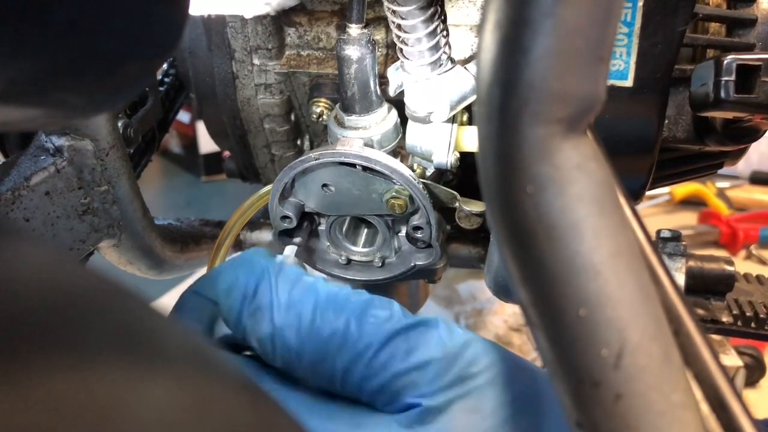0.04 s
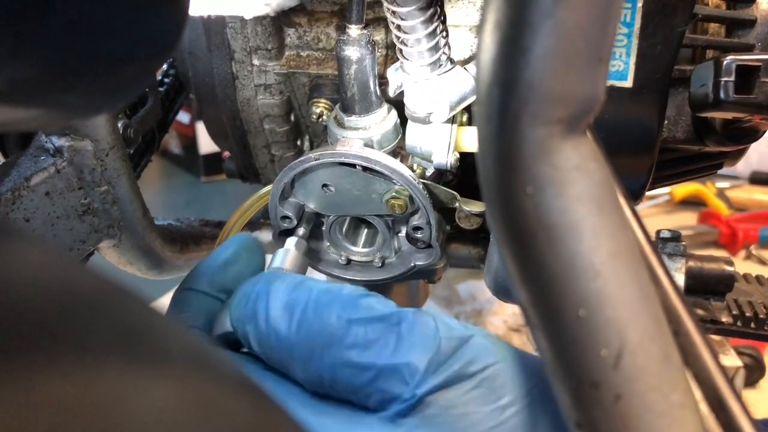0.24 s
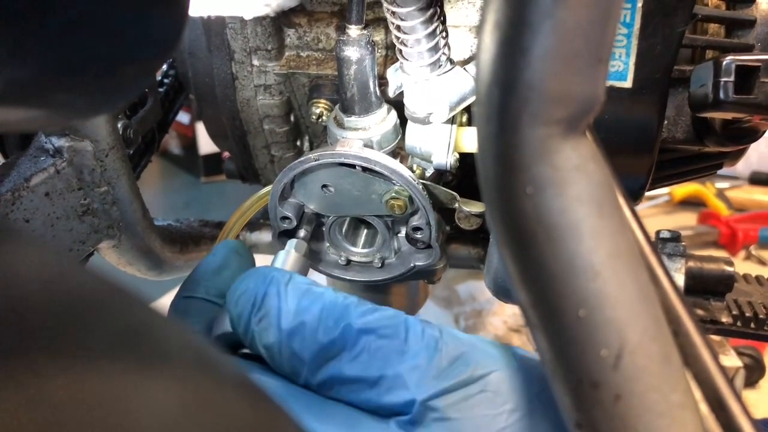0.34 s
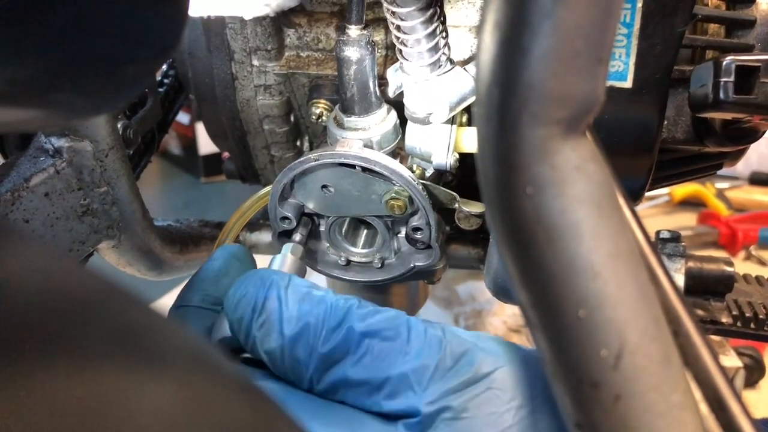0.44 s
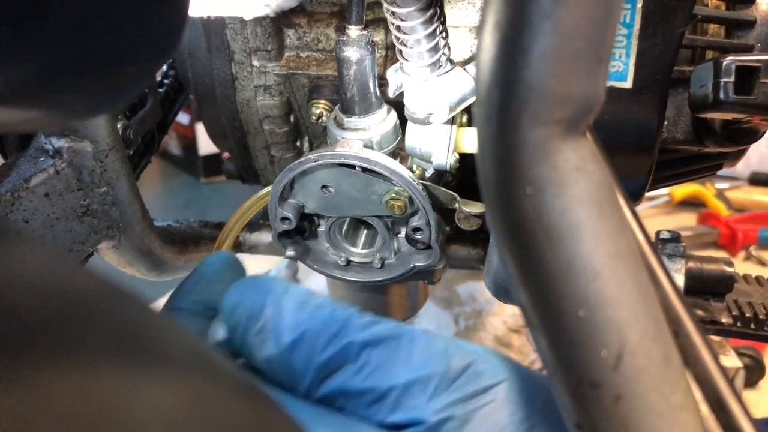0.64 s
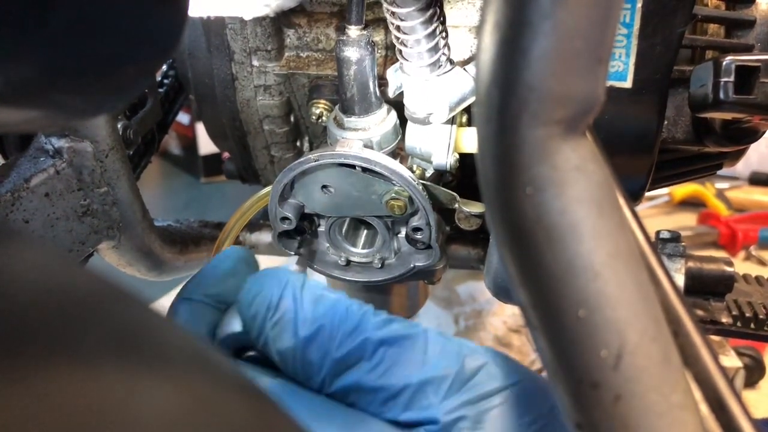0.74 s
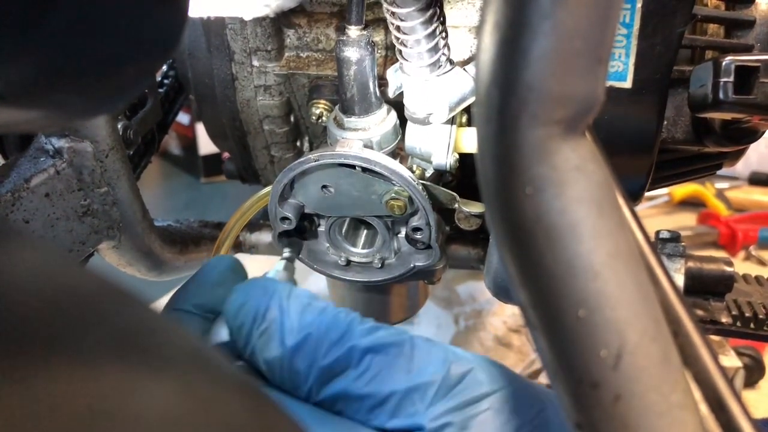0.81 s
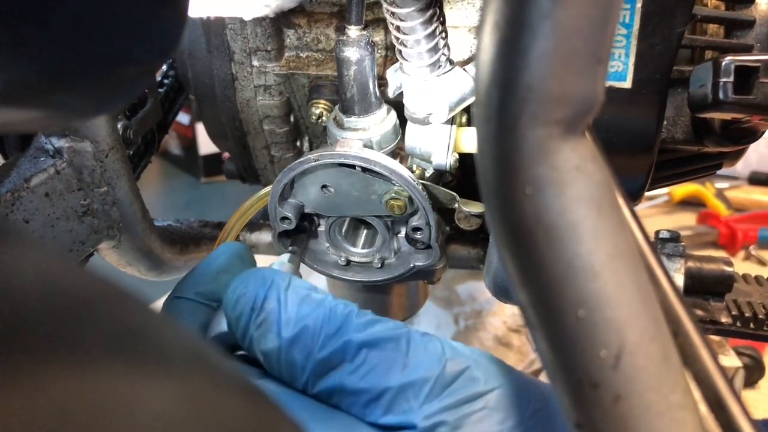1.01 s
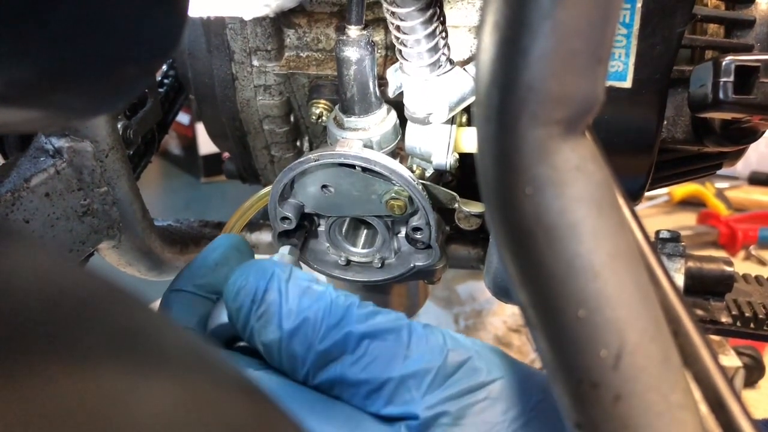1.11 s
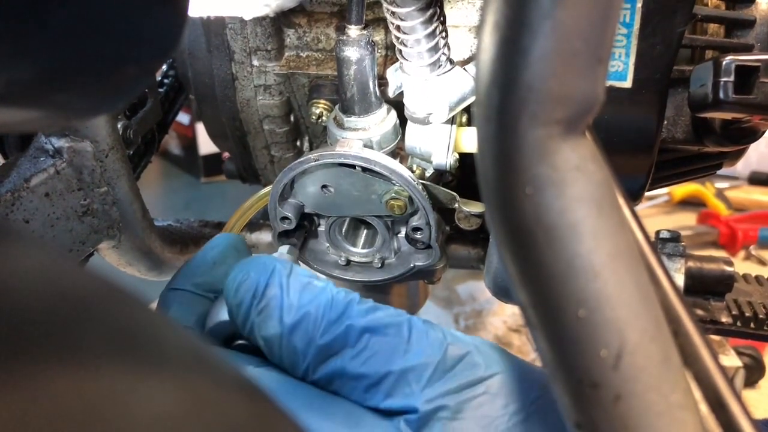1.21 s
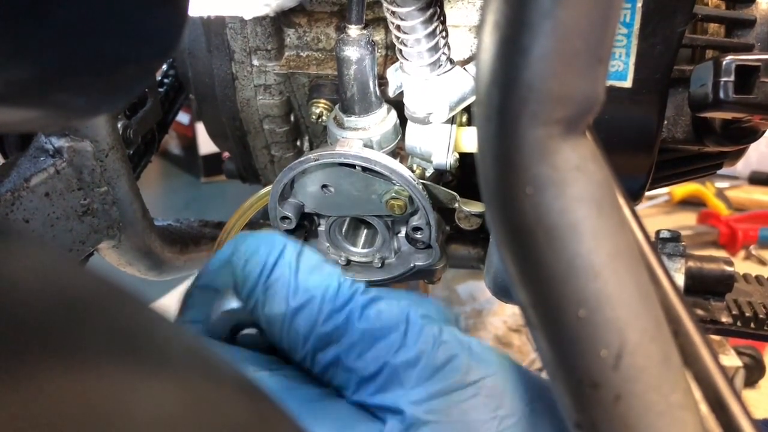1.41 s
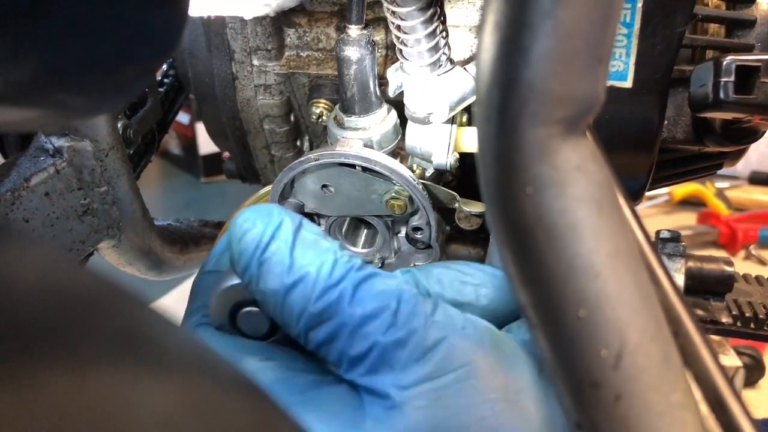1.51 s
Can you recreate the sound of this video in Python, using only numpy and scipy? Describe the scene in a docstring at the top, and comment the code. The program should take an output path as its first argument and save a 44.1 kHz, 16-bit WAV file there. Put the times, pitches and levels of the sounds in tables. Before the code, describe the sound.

Close up in a quiet workshop, ratchet clicks come in a loose cluster, pause, then a couple more sharp snaps; bit scrapes and soft hand bumps between, glove rustle and faint hiss at the end.

```python
"""Steel snaps among the scrapes of a bit: a small hand ratchet nudges an engine's carburettor screw.
Each snap is a noise crack, a chatter of random contacts and damped steel modes, shaped in five bands.
A thud chirps down through the engine's frame after it; the hand's soft bumps are filtered thuds.
Scrapes and a rubber glove's rubs, mostly near the end, are filtered random slips; a hiss swells and fades.
All of it is close by in a quiet workshop, with a faint reverberation, still air and a low hum."""
import sys
import numpy as np
from scipy import signal
from scipy.fft import rfft, irfft
from scipy.io import wavfile

SR = 44100
rng = np.random.default_rng(int(sys.argv[2]) if len(sys.argv) > 2 else 0)


def generate_wav(signal):
    """Clip the signal to [-1, 1] and save it as 16-bit WAV at the path in sys.argv[1]."""
    frames = np.transpose(np.atleast_2d(signal))
    scaled = np.clip(frames, -1, 1) * 32767
    pcm = np.round(scaled).astype(np.int16)
    wavfile.write(sys.argv[1], SR, pcm)


N = 68355

# still air, spectrum: hz, level_db
AIR_SPECTRUM = [(25, -17), (60, 13.5), (140, 11.5), (300, 9), (600, 1.5), (1200, -3), (3000, -5.5),
                (8000, -13.5), (16000, -9)]
AIR_DB, HUM_HZ, HUM_DB = -67, 147, -79

# workshop reverberation: low_hz, high_hz, t60_s, level_db
ROOM_TAIL = [(80, 916, 0.16, -6), (650, 2150, 0.79, -22.5), (1830, 6800, 0.26, -19),
             (8400, 19000, .25, -28)]
EARLY_DB, EARLY_T60_S = -24, 0.1

# hiss that swells and fades, level over time: time_s, level_db
HISS_LEVEL_CURVE = [(0, -103), (.08, -75), (0.129, -54), (.2, -57.5), (.25, -70), (.31, -58), (.37, -58),
                    (.44, -56.5), (.5, -71.5), (0.701, -96.5), (1.192, -88.5), (1.22, -60), (1.27, -83),
                    (1.38, -68), (1.46, -60), (1.55, -61.5)]
# hiss that swells and fades, spectrum: hz, level_db
HISS_SPECTRUM = [(1000, -6), (3500, 5.5), (7000, 2.5), (11000, 3.5), (15500, 6)]

# rubs of the glove on the handle: start_s, length_s, level_db, rasp_hz
GLOVE_RUBS = [(0, .055, -57, 2128), (0.809, 0.095, -67.5, 3200), (1.205, 0.027, -69.5, 3100),
              (1.304, .022, -54, 3960), (1.35, 0.023, -61.5, 3500), (1.414, 0.073, -63, 2960),
              (1.453, 0.05, -58, 2870)]
# rubber on steel, spectrum: hz, level_db
RUB_SPECTRUM = [(500, -4), (1800, -3), (2900, -1), (3800, -5.5), (5000, -11.5), (7500, -8), (10000, -17),
                (16000, -21)]
RUB_RASP_DB, RUB_WIDTH = -4.5, 0.57  # width as a share of the rasp's pitch

# scrapes of the bit in the screw: start_s, length_s, level_db, centre_hz
BIT_SCRAPES = [(0, 0.0061, -37.5, 1100), (.01, 0.064, -53.5, 970), (0.059, 0.031, -52, 694),
               (0.149, 0.047, -46, 1050), (0.246, 0.02, -58, 1080), (0.32, 0.048, -51, 1000),
               (0.378, 0.0064, -46.5, 680), (0.423, 0.093, -64.5, 850), (0.832, 0.014, -53.5, 1086),
               (0.862, 0.014, -50.5, 520), (0.886, 0.022, -56, 592), (.915, 0.024, -77, 604),
               (0.919, 0.02, -64.5, 1360), (0.984, .03, -59, 1100), (1.085, 0.09, -60, 850),
               (1.144, 0.0034, -46.5, 1550), (1.166, 0.027, -71, 750)]
SCRAPE_WIDTH, SCRAPE_GRIT_DB, SCRAPE_RELEASE_S = 0.53, -9.5, 0.011  # width as a share of the centre
SCRAPE_FRAME_GAIN = 10 ** (-4 / 20) / 6

# modes of engine and frame: hz, level_db, t60_s
FRAME_MODES = [(147.2, 1.5, 0.2), (230, -4.5, 0.072), (338, -4, 0.23), (458, -4.5, .08), (552, 0.5, .07),
               (680, -7.5, .07), (1066.5, 3, .18), (1152, 1, 0.23), (1246, 1.5, 0.16)]
# thud through the frame, spectrum: hz, level_db
THUD_SPECTRUM = [(40, -27), (90, -14), (145, -1.5), (200, -5.5), (330, -3), (550, -0.5), (800, -5.5),
                 (1200, -20), (3000, -62)]
THUD_LAG_S, THUD_T60_S, THUD_RING_DB = 0.01711, 0.071, -8.5  # lag at 150 Hz
# soft bumps of the hand on the frame: start_s, level_db, highest_hz
HAND_BUMPS = [(-.015, -39.5, 455), (0.442, -57.5, 88), (0.777, -47, 152), (1.09, -54, 200),
              (1.207, -56.5, 300), (1.305, -51.5, 184), (1.376, -58.5, 181), (1.456, -52.5, 607)]

# snaps of pawl and socket: start_s, chatter_s, thud_db, ring_db in five bands from low to high,
# focus_hz (where the tool's modes are struck harder)
RATCHET_SNAPS = [(0.049, 0.002, -49.5, -56, -63.5, -62.5, -70, -76, 2130),
                 (0.206, 0.0037, -33, -25.5, -27, -28, -27, -34.5, 1733),
                 (0.292, 0.0012, -46, -52, -59, -48.5, -52, -47.5, 3200),
                 (0.3163, 0.0032, -41, -34, -45.5, -42.5, -32.5, -28, 7280),
                 (0.387, 0.0019, -50.5, -70, -59.5, -63, -57.5, -58, 6640),
                 (0.4555, 0.001, -54.5, -53.5, -61, -56, -52.5, -67, 5378),
                 (0.5537, 0.0049, -66.5, -66, -62, -57, -56.5, -53, 4480),
                 (0.6045, 0.0055, -42, -42.5, -63.5, -51.5, -38.5, -38.5, 7900),
                 (0.7531, 0.0022, -56.5, -52.5, -62, -59, -52, -59.5, 5378),
                 (0.7699, 0.003, -48.5, -48, -42.5, -33, -33.5, -60, 2930),
                 (1.0215, 0.0054, -38.5, -37.5, -33.5, -31.5, -26, -37.5, 7280),
                 (1.16, 0.0023, -49.5, -53.5, -77, -50.5, -56, -63.5, 3200),
                 (1.1909, 0.0018, -62, -65, -67, -61, -71.5, -93, 2930)]
# edges of the five ring bands: hz
RING_EDGES_HZ = [800, 1400, 2500, 4200, 8500, 16500]
# modes of the steel tool: hz, level_db, t60_s
TOOL_MODES = [(1067, 1, 0.041), (1243.7, -2, 0.055), (1726, -1.5, 0.028), (2120, -7.5, 0.079),
              (2260, -0.5, 0.03), (2930, 1.5, 0.023), (3238, -1.5, .024), (4480, -15.5, 0.082),
              (5378, -0.5, 0.026), (6170, -13.5, .08), (6650, -0.5, 0.023), (7280, 0.5, 0.033),
              (7900, 2, 0.018), (9900, 1, 0.0064)]
# spectrum of the top ring band: hz, level_db
TOP_SPECTRUM = [(8500, 0), (11000, -1), (12500, -3.5), (16000, -2.5)]
FOCUS_DB, FOCUS_OCTAVES, MODE_SCATTER_DB = 5.5, 0.088, 2.5
CRACK_T60_S, CRACK_DB = 0.048, -5
CHATTER_DB, CHATTER_PER_S, CHATTER_RELEASE_S, CHATTER_RING_DB = -3, 14000, 0.00033, -15.5
TOP_T60_S, TOP_TAIL_DB = 0.017, -13  # extra damping of the top band, and the floor added to it
LOW_RING_LAG_S, FRAME_RING_DB = 0.001207, -7

LOW_CUT_HZ, TOP_HZ = 29, 16000


def undb(db):
    """Decibels to gain."""
    return 10 ** (np.asarray(db) / 20)


def seconds():
    """Time of every sample."""
    return np.arange(N) / SR


def decay(t, t60):
    """Exponential decay, down 60 dB after t60 seconds."""
    return np.exp(-np.log(1000) * t / t60)


def unit(x):
    """Scale to unit energy."""
    return x / np.sqrt(np.sum(x ** 2) + 1e-18)


def level(x, db):
    """Scale to an rms level over the whole scene."""
    return unit(x) * np.sqrt(N) * undb(db)


def blow(x, db):
    """Scale a hit to a level, its energy taken over 10 ms."""
    return unit(x) * np.sqrt(SR / 100) * undb(db)


def through(x, response):
    """Pass a sound through an impulse response."""
    return signal.fftconvolve(x, response)[:N]


def band(x, lo_hz, hi_hz, order=3):
    """Causal band-pass."""
    edges = [lo_hz, min(hi_hz, SR / 2 - 500)]
    return signal.sosfilt(signal.butter(order, edges, "band", fs=SR, output="sos"), x + 1e-18)


def band_around(x, hz, width):
    """Gentle band-pass around a centre."""
    reach = 1 + width / 2
    return band(x, hz / reach, hz * reach, order=2)


def gains(points):
    """Gain at every frequency from (hz, level_db) points."""
    hz, db = np.array(points, float).T
    log_hz = np.log(np.fft.rfftfreq(N, 1 / SR) + 1)
    return undb(np.interp(log_hz, np.log(hz), db))


def colour(x, points):
    """Shape a sound with a spectrum."""
    return irfft(rfft(x) * gains(points), N)


def burst(t60):
    """Noise that dies away."""
    return unit(rng.standard_normal(N) * decay(seconds(), t60))


def at(x, start):
    """Move a sound to its time; a negative time trims its beginning."""
    k = int(round(start * SR))
    return np.pad(x, (max(k, 0), N))[max(-k, 0):][:N]


def ring(modes):
    """Impulse response of damped modes, their signs alternating."""
    t = seconds()[:N // 4]
    total = np.zeros(len(t))
    for k, (hz, db, t60) in enumerate(modes):
        total += (-1) ** k * undb(db) * np.sin(2 * np.pi * hz * t) * decay(t, t60)
    return at(unit(total), 0)


def stroke(start, length, attack, release):
    """Attack, hold, release."""
    t = seconds() - start
    return np.clip(t / attack, 0, 1) * np.exp(-np.maximum(t - length, 0) / release)


def friction(rate, spread_db):
    """Dense tiny slips of uneven size, at random instants."""
    slips = (rng.random(N) < rate / SR) * rng.standard_normal(N)
    return slips * undb(spread_db * np.minimum(rng.exponential(size=N), 3))


def still_air():
    """Steady noise, heaviest in the lows."""
    return level(colour(rng.standard_normal(N), AIR_SPECTRUM), AIR_DB)


def hum():
    """A faint steady sine."""
    return level(np.sin(2 * np.pi * HUM_HZ * seconds()), HUM_DB)


def workshop(x):
    """Quick reflections from the engine, then a faint room tail that decays differently in each band."""
    early = undb(EARLY_DB) * unit(band(burst(EARLY_T60_S), 100, 11000, order=2))
    tail = sum(undb(db) * band(burst(t60), lo, hi) for lo, hi, t60, db in ROOM_TAIL)
    return x + through(x, at(early, 0.003) + at(tail, 0.008))


def hiss():
    """Coloured noise that swells and fades along a level curve."""
    noise = level(colour(rng.standard_normal(N), HISS_SPECTRUM), 0)
    return noise * undb(np.interp(seconds(), *np.array(HISS_LEVEL_CURVE).T))


def glove():
    """Grainy rubs of rubber on steel, each with a rasp of its own."""
    out = np.zeros(N)
    for start, length, db, hz in GLOVE_RUBS:
        grains = through(friction(rate=5000, spread_db=2), burst(0.002))
        rasp = unit(band_around(grains, hz, RUB_WIDTH))
        rub = unit(colour(grains, RUB_SPECTRUM)) + undb(RUB_RASP_DB) * rasp
        out += level(rub, db) * stroke(start, length, attack=0.0071, release=0.008)
    return out


def scrapes():
    """Stick and slip of the bit, sounding through the engine's casting."""
    out, frame = np.zeros(N), ring(FRAME_MODES)
    for start, length, db, hz in BIT_SCRAPES:
        slips = friction(rate=2100, spread_db=0) * stroke(start, length, 0.0019, SCRAPE_RELEASE_S)
        rasp = unit(band_around(slips, hz, SCRAPE_WIDTH))
        casting = SCRAPE_FRAME_GAIN * through(rasp, frame)
        grit = undb(SCRAPE_GRIT_DB) * unit(band(slips, 2200, 7500, order=2))
        body = undb(-5.5) * unit(band(slips, 180, 520, order=2))
        # level taken over the scrape's own length
        out += unit(rasp + casting + grit + body) * undb(db) * np.sqrt(length * SR)
    return out


def thud(db):
    """A bending wave crosses the frame: its delay goes as one over the root of frequency, so it chirps down."""
    hz = np.fft.rfftfreq(N, 1 / SR)
    dispersion = np.exp(-4j * np.pi * THUD_LAG_S * np.sqrt(150 * hz))
    chirp = irfft(gains(THUD_SPECTRUM) * dispersion, N)
    chirp = unit(at(chirp[:N // 8], -THUD_LAG_S / 3))
    scatter = undb(5.0) * unit(through(chirp, burst(THUD_T60_S)))
    frame = undb(THUD_RING_DB) * unit(through(chirp, ring(FRAME_MODES)))
    return blow(chirp + scatter + frame, db)


def bumps():
    """The hand knocks against the frame; each push has its own level and dullness."""
    out = np.zeros(N)
    for start, db, highest_hz in HAND_BUMPS:
        push = band(thud(0), 40, highest_hz, order=2)
        out += at(blow(push, db), start)
    return out


def struck_steel(focus_hz):
    """Ring of the tool: modes near the focus are struck harder, and all vary a little at random."""
    modes = []
    for hz, db, t60 in TOOL_MODES:
        focus = FOCUS_DB * np.exp(-(np.log2(hz / focus_hz) / FOCUS_OCTAVES) ** 2)
        modes.append((hz, db + focus + MODE_SCATTER_DB * rng.standard_normal(), t60))
    return ring(modes)


def snaps():
    """A sharp contact cracks and rings the steel, and the parts chatter briefly; the top is damped faster."""
    out, t, frame = np.zeros(N), seconds(), ring(FRAME_MODES)
    top_damping = decay(t, TOP_T60_S) + undb(TOP_TAIL_DB)
    for start, length, thud_db, *ring_db, focus_hz in RATCHET_SNAPS:
        steel = struck_steel(focus_hz)
        fade = np.exp(-np.maximum(t - length, 0) / CHATTER_RELEASE_S)
        chatter = unit(friction(CHATTER_PER_S, spread_db=4) * fade)
        crack = undb(CRACK_DB) * burst(CRACK_T60_S) + undb(-4.5) * burst(0.0023)
        chatter_ring = undb(CHATTER_RING_DB) * unit(through(chatter, steel))
        hit = steel + crack + undb(CHATTER_DB) * chatter + chatter_ring
        top = colour(hit, TOP_SPECTRUM) * top_damping
        for k, db in enumerate(ring_db):
            source = top if k == len(ring_db) - 1 else hit
            part = band(source, RING_EDGES_HZ[k], RING_EDGES_HZ[k + 1], order=4)
            lag = LOW_RING_LAG_S if k == 0 else 0  # the lowest band comes late
            out += at(blow(part, db), start + lag)
        out += at(thud(thud_db) + blow(frame, thud_db + FRAME_RING_DB), start)
    return out


def scene():
    """Tool, hand and hiss in the room, over still air and a faint hum."""
    background = still_air() + hum()
    close = hiss() + glove() + scrapes() + bumps() + snaps()
    return (workshop(close) + background)[None]


def record(dry):
    """Cut the deep bass gently and the top steeply."""
    thin = signal.sosfilt(signal.butter(2, LOW_CUT_HZ, "high", fs=SR, output="sos"), dry)
    return signal.sosfilt(signal.ellip(8, 0.2, 70, TOP_HZ, fs=SR, output="sos"), thin)


dry = scene()
out = record(dry)
generate_wav(out)
```